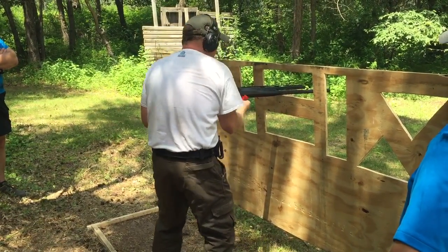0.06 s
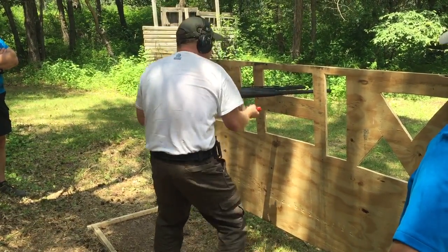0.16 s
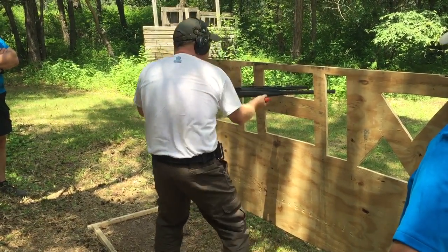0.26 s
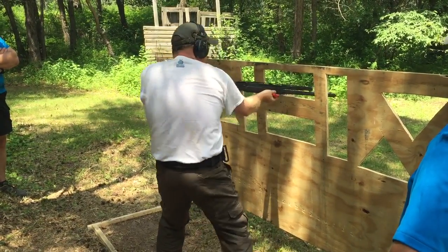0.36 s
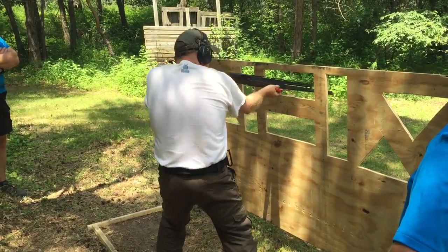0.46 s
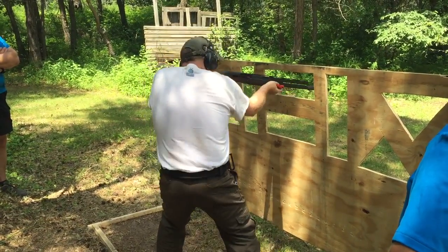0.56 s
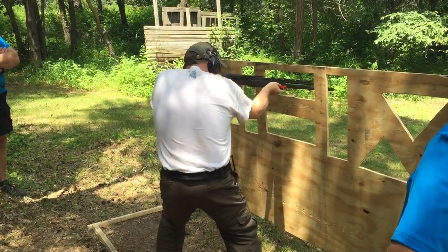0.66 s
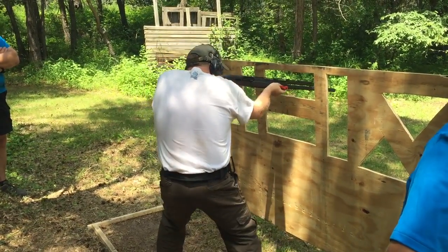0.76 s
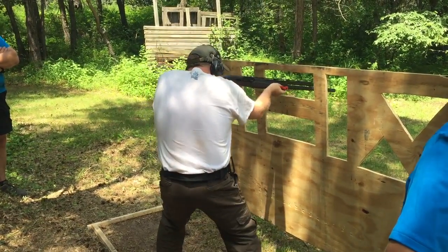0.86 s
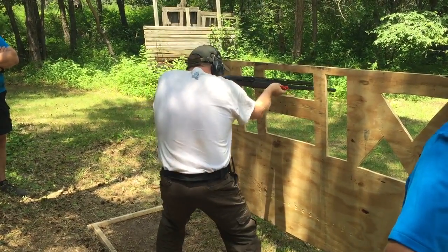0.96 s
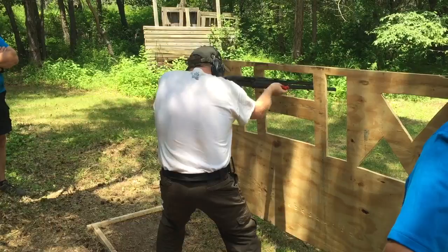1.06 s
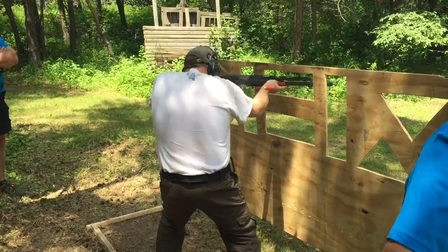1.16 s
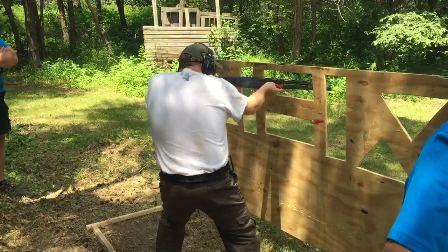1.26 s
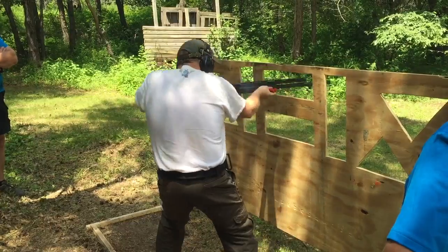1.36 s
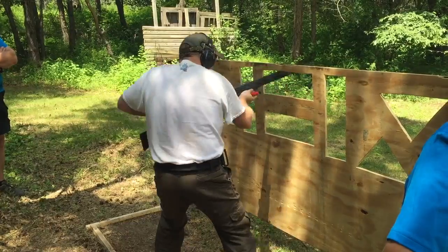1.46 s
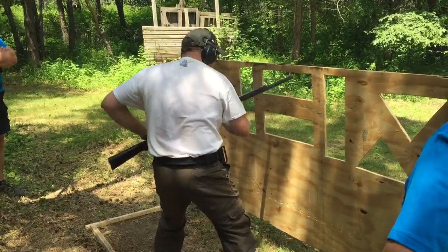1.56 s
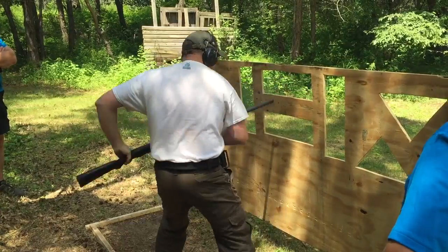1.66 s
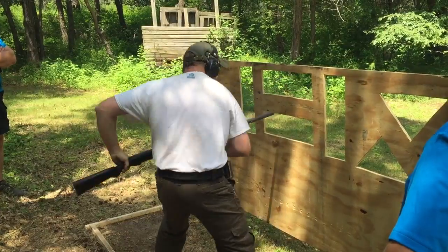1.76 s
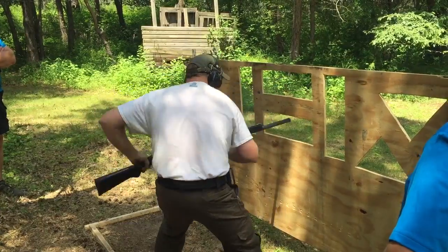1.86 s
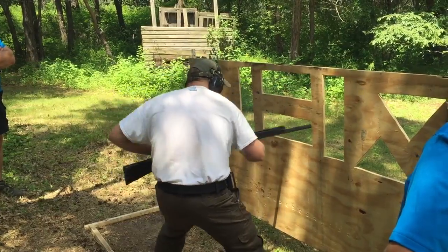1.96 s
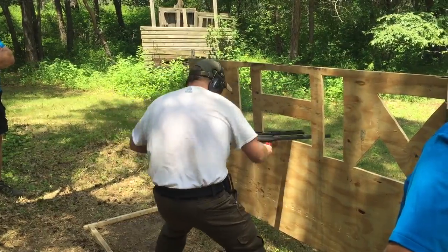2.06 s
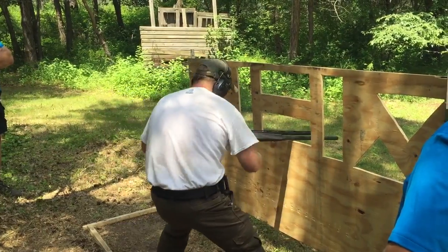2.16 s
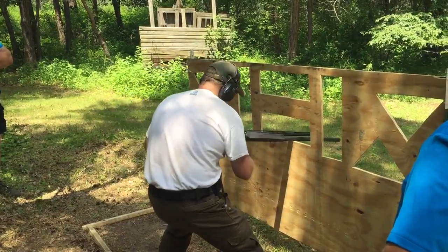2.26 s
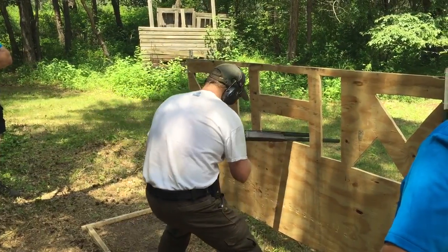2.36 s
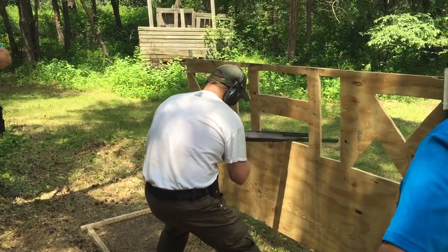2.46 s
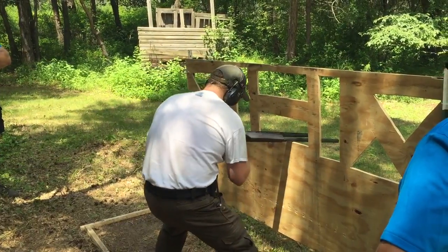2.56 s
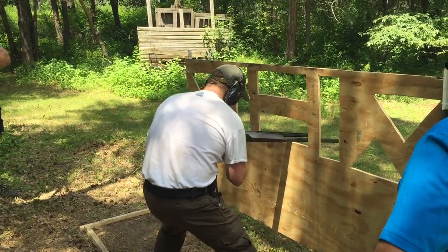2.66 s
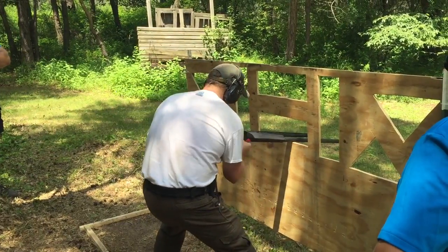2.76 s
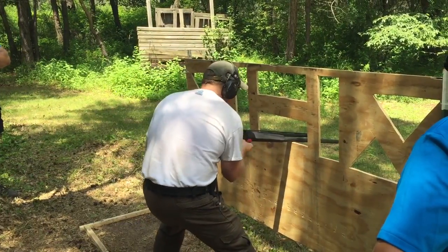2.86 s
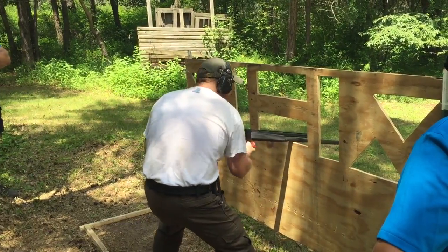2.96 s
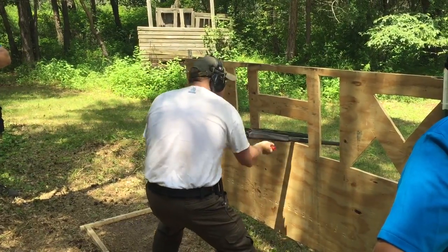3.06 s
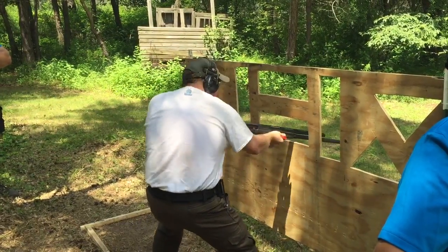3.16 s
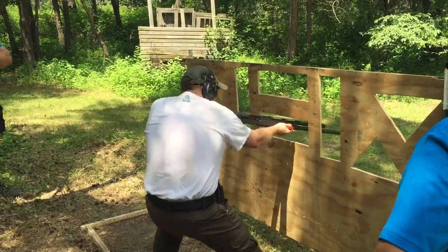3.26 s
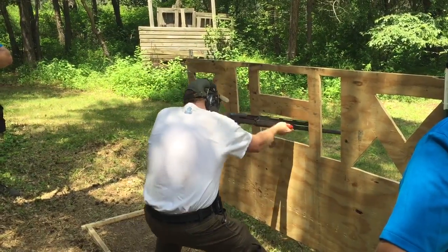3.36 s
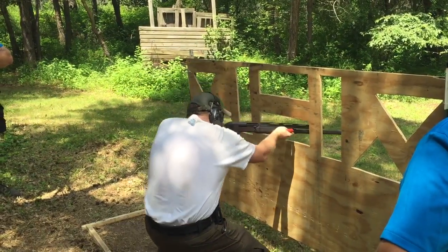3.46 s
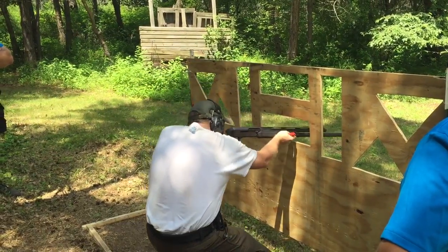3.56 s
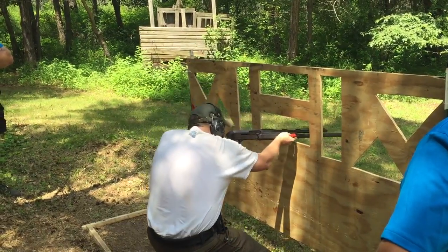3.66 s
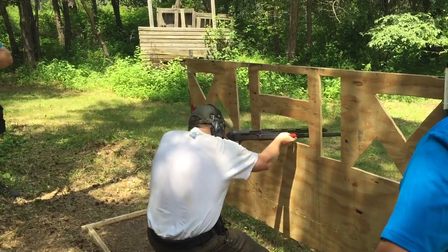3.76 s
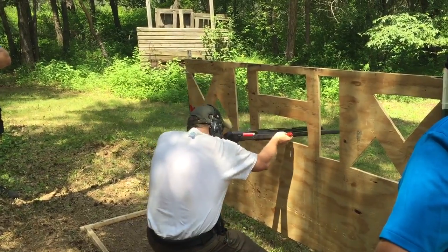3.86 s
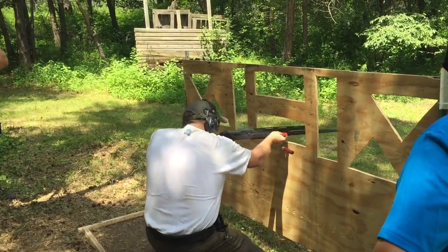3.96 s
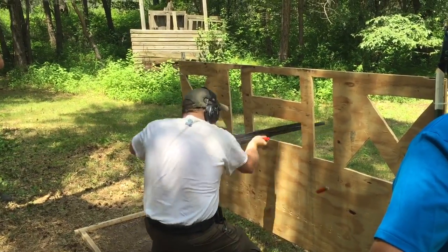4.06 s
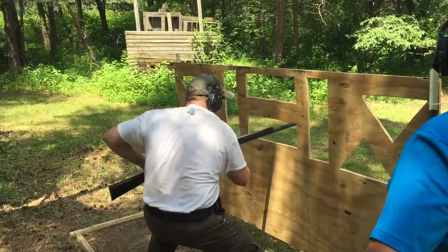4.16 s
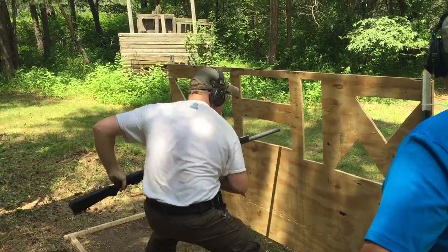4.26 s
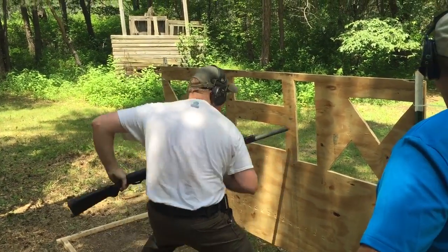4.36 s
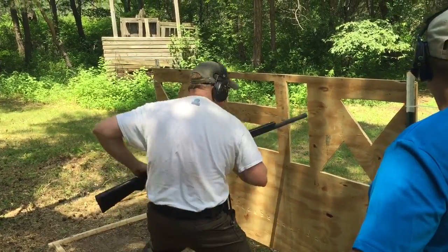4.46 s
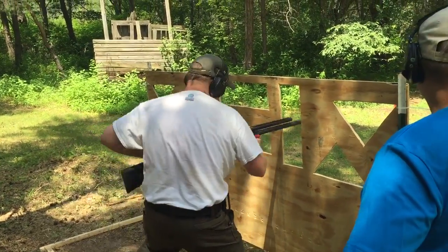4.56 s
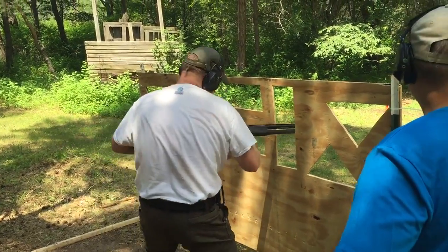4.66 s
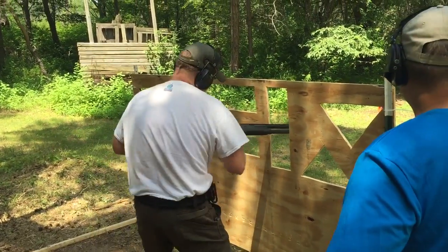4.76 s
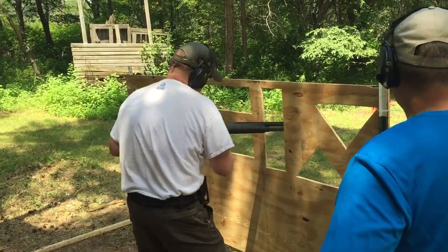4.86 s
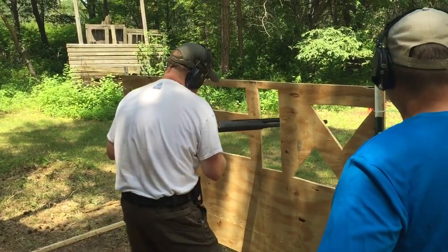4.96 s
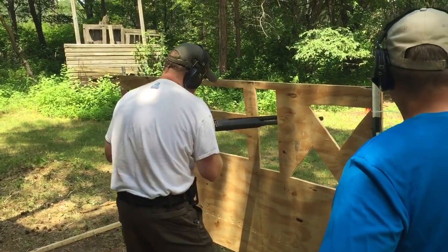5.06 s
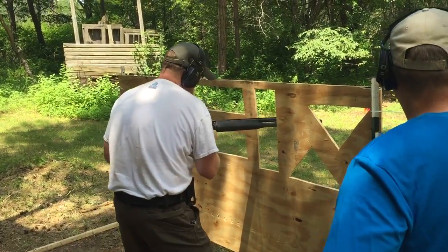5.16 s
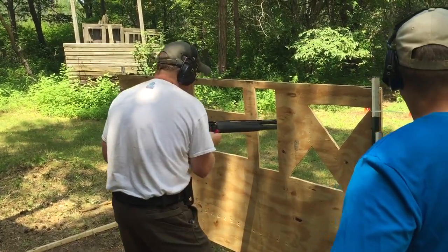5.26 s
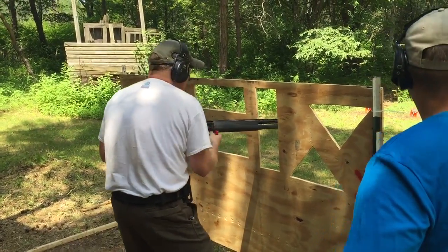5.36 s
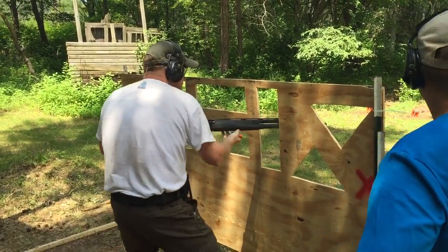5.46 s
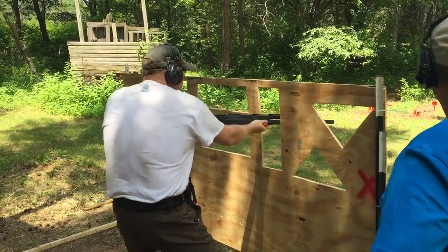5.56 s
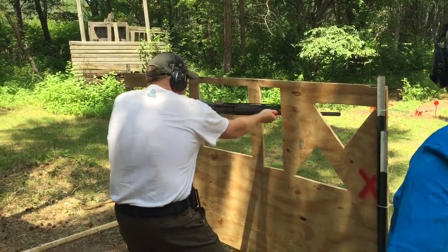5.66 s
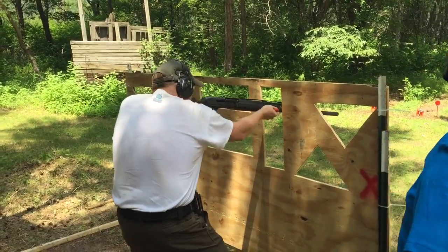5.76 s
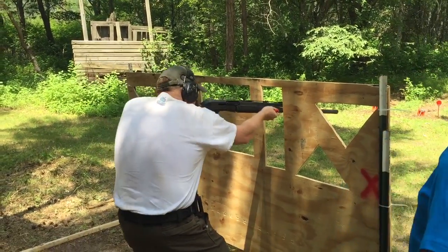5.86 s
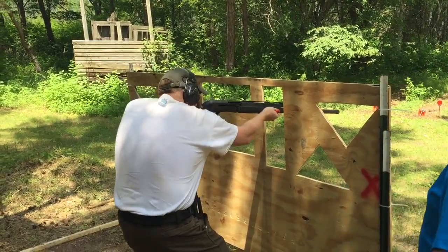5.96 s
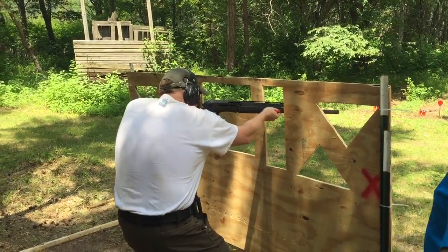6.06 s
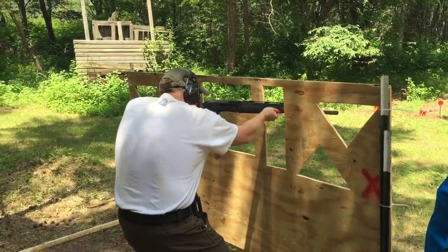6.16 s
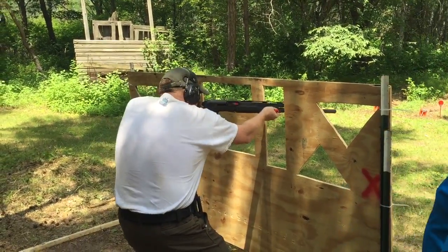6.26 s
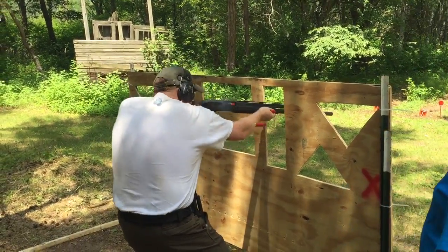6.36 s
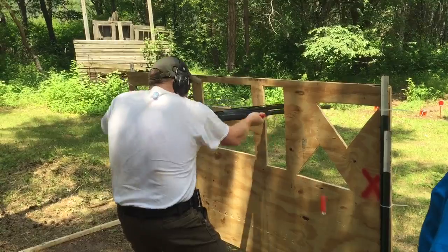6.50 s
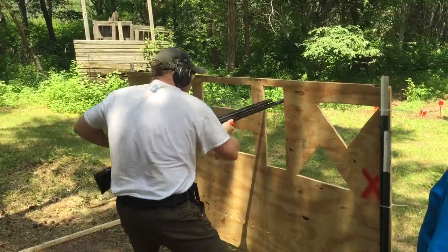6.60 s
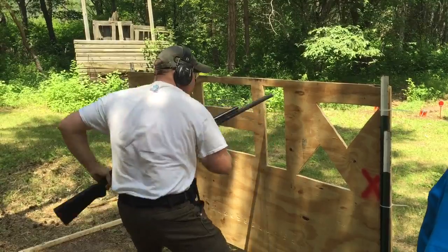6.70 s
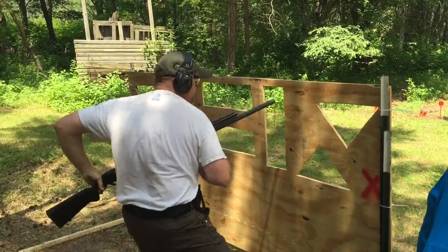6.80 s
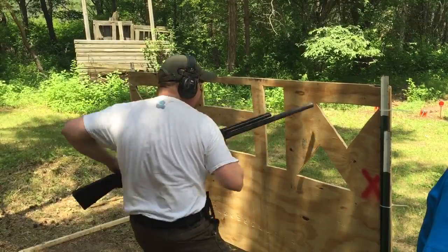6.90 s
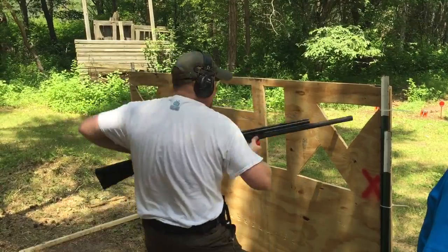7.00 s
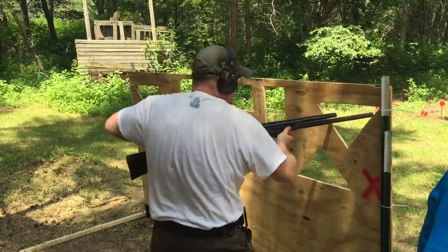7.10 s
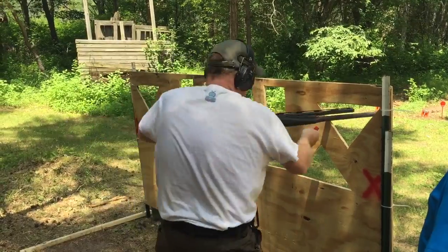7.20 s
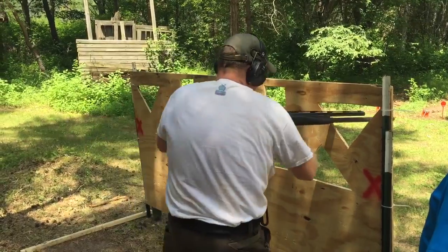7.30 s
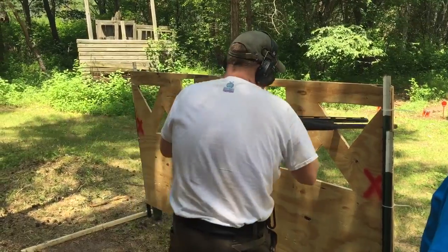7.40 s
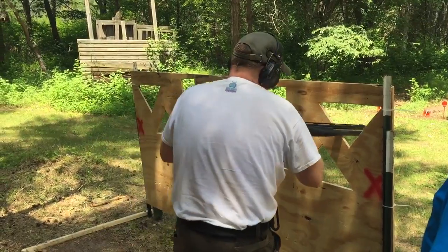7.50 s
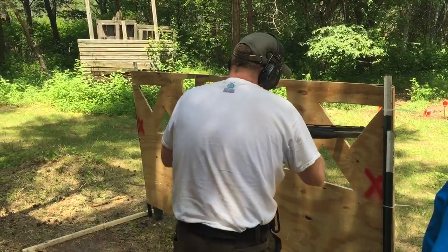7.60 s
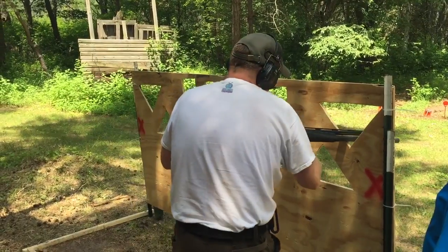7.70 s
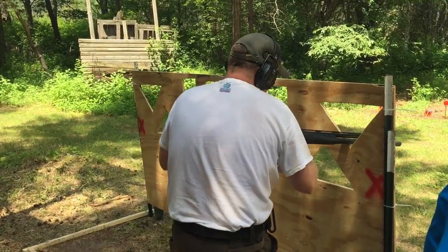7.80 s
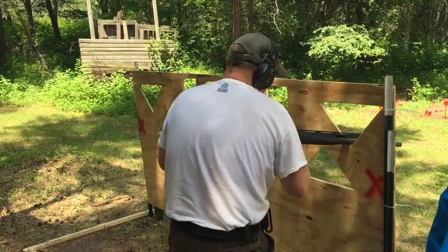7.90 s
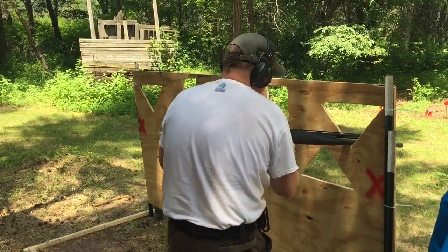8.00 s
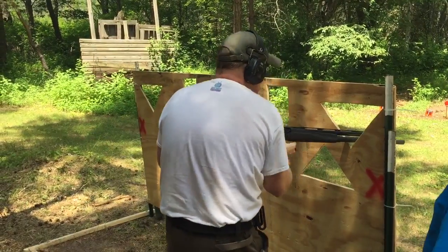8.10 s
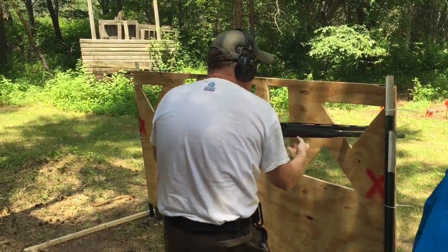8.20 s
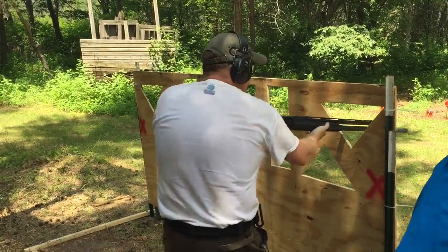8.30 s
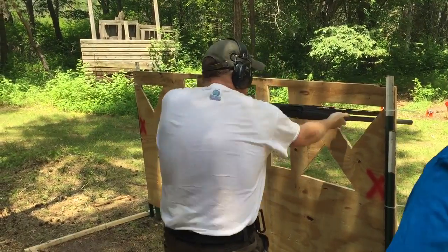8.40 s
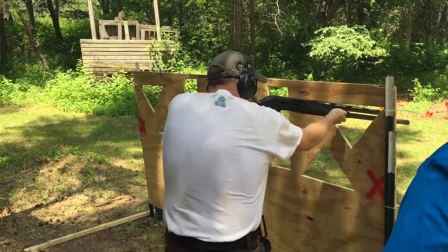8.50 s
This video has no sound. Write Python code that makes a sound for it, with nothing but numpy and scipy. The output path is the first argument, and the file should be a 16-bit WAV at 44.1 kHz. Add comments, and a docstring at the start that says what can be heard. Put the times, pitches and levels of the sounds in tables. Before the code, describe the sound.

Three huge overloading shotgun blasts seconds apart outdoors, each rolling into a long woodland roar, with sharp metallic loading clicks and board knocks between.

```python
"""In a wood, beside a plywood barricade, a self-loading shotgun fires three times, a few metres from the microphone.
Each blast is bursts of noise and a low punch; it overloads the microphone and the trees return a long dull roar.
Shells are loaded with clicks (short cracks and ringing metal) and slides (rough hiss), and a spent shell chimes.
The gun knocks the boards, cloth rustles and feet thud, all from shaped noise, the knocks with ringing metal too.
Two far guns boom, and a low rumble, which dips after each blast, lies over a faint hiss of leaves."""
import sys
import numpy as np
from scipy import signal
from scipy.fft import rfft, irfft, next_fast_len
from scipy.io import wavfile
from scipy.ndimage import uniform_filter1d

SR = 44100
rng = np.random.default_rng(int(sys.argv[2]) if len(sys.argv) > 2 else 0)


def store_pcm(level_fs):
    """Save levels as 16-bit WAV."""
    pcm = np.round(np.clip(level_fs, -1, 1) * 32767).astype(np.int16)
    wavfile.write(sys.argv[1], SR, np.atleast_2d(pcm).T)


N = 376612
T = np.arange(N) / SR  # time in seconds

# In all tables "t60" is the time a sound takes to die by 60 dB; levels are those before the microphone.

# The three shots. Each row: start in seconds, level in dB, level of the wood's roar in dB, extra roar
# around 1600 Hz in dB, delay of the bolt's slam in seconds, bass adjustment in dB.
SHOT_EVENTS = [(1.1935, 6.5, -17, -6, 0.056, 3.5), (3.9383, 7.5, -19, 0, 0.061, -8),
               (6.371, 8, -18, -4, .058, 2.5)]
# The blast opens sharp and sinks as the gas bubble grows. Each row: low edge in Hz, high edge in Hz,
# level in dB, rise time in seconds, t60 in seconds.
MUZZLE_BANDS = [(4080, 13000, -7.5, 0.0034, 0.095), (3000, 7400, -24, 0.0032, 0.46),
                (1230, 3500, 0.5, 0.0041, 0.087), (398, 1200, 2, 0.0061, 0.087),
                (118, 300, -1, 0.011, 0.074)]
# Every blast returns from ground and boards. Each row: delay in seconds, typical level in dB, t60 in
# seconds, added treble in dB, added bass in dB before the shot's own bass adjustment.
BLAST_RETURNS = [(.027, -1.5, .06, -5.5, -3), (.043, -9.5, .08, -8.5, -2.5), (.073, -10, .07, -13, -7),
                 (.092, -16, .13, -19, -9), (.117, -20.5, 0.057, -22, -21)]
# The bolt slams back, then shuts. Each row: seconds after the slam, level in dB, t60 in seconds,
# added treble in dB, added bass in dB before the shot's own bass adjustment.
BOLT_SLAMS = [(0, 0, .045, 2.5, -10.5), (0.071, -25.5, 0.086, 7.5, -22)]
# Tone colour of returns and bolt. Each row: frequency in Hz, relative level in dB per Hz.
BLAST_COLOUR = [(24, -34), (40, -4), (163, -3.5), (283, -14), (329, 1), (412, -7.5), (630, 5.5), (873, -2),
                (2980, -6), (14500, -23), (16000, -32.5)]
# Tone colour of the wood's roar. Each row: frequency in Hz, relative level in dB per Hz.
ROAR_COLOUR = [(59, -56), (100, -24.5), (193, -21), (381, -10), (424, -15), (648, -4.5), (1100, -17.5),
               (1550, -8.5), (2000, -16.5), (6150, -29.5), (12400, -36.5), (14700, -46.5), (16000, -78)]
# How each pitch dies among the trees. Each row: frequency in Hz, t60 of near trees in seconds,
# t60 of far trees in seconds, level of far trees relative to near ones in dB.
WOOD_DECAY = [(120, 0.44, 1.7, -2.5), (303, 0.8, 2.48, -9.5), (630, 1.3, 3.86, -7.5), (1620, 1.2, 3.6, -11),
              (3230, 1.48, 2.95, -13.5), (6160, 1.35, 1.5, -27), (15100, .6, 1.1, -14.5)]
# Metal and plastic clicks of loading. Each row: start in seconds, level in dB, pitch where the ring is
# strongest in Hz, added treble in dB.
LOADING_CLICKS = [(0.0179, -12, 2480, -9.5), (0.154, -29.5, 1940, -29), (0.635, -45, 5340, -25),
                  (0.167, -23, 3280, -16), (0.1853, -24.5, 3370, -22), (1.069, -50, 2950, -30),
                  (1.7511, -23, 1900, -15), (2.2016, -19, 2330, -15), (2.4044, -27, 2860, -15),
                  (2.439, -23.5, 7340, -9), (2.7745, -35.5, 1916, -22), (2.793, -30, 1940, -25),
                  (2.805, -20.5, 2000, -15), (2.8719, -16.5, 7300, -20), (2.889, -10, 3030, -12.5),
                  (3.0066, -34, 1430, -20), (3.025, -25, 2490, -19), (3.0618, -37, 4410, -16),
                  (3.0777, -34.5, 3170, -20), (4.5057, -29, 1380, -24), (4.616, -35, 1240, -14.5),
                  (4.7597, -31.5, 3380, -19), (4.8918, -28, 1340, -13.5), (4.902, -29, 1330, -14),
                  (4.915, -30, 1330, -18), (4.9882, -34.5, 9800, 0), (5.12, -32, 2060, -16),
                  (5.2013, -22, 2050, -15), (5.213, -36, 1970, -15), (5.2708, -26, 1360, -11),
                  (5.286, -23.5, 3800, -7.5), (5.3461, -14, 2920, -8.5), (5.452, -40, 5230, -29),
                  (5.471, -13, 2630, -13.5), (5.5828, -37, 1380, -7), (5.621, -10, 1180, -20),
                  (7.24, -31.5, 1390, -12), (7.307, -32.5, 1810, -16), (7.334, -24.5, 9100, -6),
                  (7.4811, -8.5, 1380, -14.5), (7.829, -52, 1280, 3.5), (8.0209, -28, 1800, -14),
                  (8.052, -30, 3400, -22), (8.061, -26, 3400, -8), (8.134, -16, 2930, -4),
                  (8.2363, -19, 1510, -6), (8.436, -33.5, 1330, -10)]
# Ringing tones of the gun. Each row: frequency in Hz, relative level in dB, t60 in seconds before the
# extra fade of each sound that uses them.
GUN_MODES = [(674, -32, 0.11), (784, -25, 0.062), (1130, -4, 0.19), (1346, 9.5, 0.015), (1590, -1.5, 0.19),
             (1912, 4.5, 0.098), (2660, 7.5, 0.019), (2964, 7.5, .06), (3350, 1.5, 0.031), (4237, 4, .05),
             (4700, -6, 0.038), (5450, -3, 0.042), (7050, -6, 0.099), (7300, -8, .05), (8800, -4, .04),
             (9100, -3, 0.09), (11800, -12, .04)]
# Dull knocks, mostly of the gun on the boards; the one at 4.208 s is an echo. Each row: start in seconds,
# level in dB, added treble in dB, t60 of the crack in seconds.
DULL_KNOCKS = [(.373, -30, -15, 0.093), (0.386, -21, -18, 0.068), (.492, -37, -23, 0.038),
               (0.5404, -39, -15, 0.081), (0.5857, -41, -13, 0.13), (2.224, -26.5, -15.5, 0.072),
               (3.273, -35, -35, 0.047), (3.385, -43, -30, .1), (3.412, -23, -30, 0.14),
               (3.4391, -33, -24.5, 0.076), (3.5716, -30.5, -28, .04), (4.208, -19.5, -21, .04),
               (7.603, -31.5, -18.5, 0.064)]
# A spent shell's brass base lands and bounces. Each row: start in seconds, typical level in dB,
# pitch where the ring is favoured in Hz.
SHELL_CHIMES = [(6.929, -38, 7500), (6.95, -24.5, 5500), (7.213, -45, 6330)]
# Ringing tones of the brass. Each row: frequency in Hz, relative level in dB, t60 in seconds before an extra fade.
BRASS_MODES = [(2630, -8, .15), (3660, 0, 0.16), (3914, -13, .3), (6330, -1, 0.18), (6860, -14, .12),
               (7560, -10, .07), (8970, -12, 0.16), (11260, -10, .05), (12350, -24, 0.31), (13750, -24, .2)]
# A shell or the bolt slides home. Each row: start in seconds, time it seats in seconds, level on seating in dB.
SLIDE_EVENTS = [(-.03, 0.026, -33.5), (2.79, 2.809, -40), (2.828, 2.893, -31), (3.404, 3.417, -35),
                (5.28, 5.338, -32.5), (8.027, 8.075, -44), (8.089, 8.135, -30)]
# Cloth and hands rubbing. Each row: start in seconds, end in seconds, typical level in dB,
# top of the hiss in Hz.
RUSTLE_EVENTS = [(0.033, 0.244, -52.5, 11900), (0.249, .49, -43.5, 6200), (.5, 0.766, -55.5, 2200),
                 (0.777, .9, -47, 5800), (2.918, 3.12, -55.5, 11030), (3.18, 3.267, -60.5, 9050),
                 (5.195, 5.3, -50.5, 9040), (5.37, 5.465, -56, 8980), (5.607, 5.686, -47.5, 8040),
                 (5.477, 5.566, -57.5, 8990), (6.898, 7.257, -62, 13020), (7.316, 7.47, -54.5, 10990),
                 (7.5, 7.656, -59, 11040), (8.17, 8.23, -57, 11000), (8.244, 8.312, -55.5, 7000)]
# Feet on soft ground. Each row: start in seconds, level in dB before halving, pitch in Hz, t60 in seconds.
FOOTSTEPS = [(0.519, -39.5, 184, .45), (0.686, -39, 119, .2), (1.612, -31.5, 224, 0.2),
             (2.204, -32.5, 192, 0.38), (3.42, -25, 220, .22), (3.477, -35, 194.3, .45),
             (7.089, -34, 95, .17), (7.242, -27, 175, .3), (7.603, -36, 130, 0.4)]
# Distant shots. Each row: start in seconds, level of the boom in dB, level of the roar in dB.
FAR_SHOTS = [(5.792, -27.5, -36.5), (8.38, -27, -38.5)]
# Tone colour of the far roar. Each row: frequency in Hz, relative level in dB per Hz.
FAR_ROAR_COLOUR = [(59, -36), (100, -26.5), (193, -22), (540, -4.5), (649, 0), (2470, -20), (2710, -23),
                   (8000, -53), (10400, -99), (17600, -120)]
# Level of the low rumble, which dips after each blast and recovers. Each row: time in seconds,
# typical level in dB.
RUMBLE_LEVELS = [(0.0, -55), (0.12, -55), (1.16, -54), (1.42, -57), (3.64, -51), (4.07, -56), (4.5, -66),
                 (4.68, -65), (4.95, -55.5), (6.42, -53.5), (6.66, -61.5), (6.92, -61), (7.25, -54),
                 (8.54, -55.5)]
# Tone colour of the low rumble of wind. Each row: frequency in Hz, relative level in dB per Hz.
RUMBLE_TONE = [(15, -40.5), (25, -18), (39, -5.5), (70, 5), (135, -2.5), (194, -25), (259, -24.5),
               (300, -25), (390, -51.5), (660, -120)]
# Tone colour of the leaf hiss. Each row: frequency in Hz, relative level in dB per Hz.
LEAF_TONE = [(120, -39), (200, -14.5), (380, -11.5), (432, -19), (696, -9.5), (1480, -25), (4950, -29.5),
             (14900, -34.5), (16000, -41.5)]

LEAD_IN_S, LEAD_TICK_DB = 0.021, -36.5
SWELL_DB, SWELL_DB_PER_S = -7.5, 1500
PUNCH_HZ, PUNCH_DB, PUNCH_RISE_S = 73.6, -8.5, 0.0072
RETURN_SPREAD_DB = 1.5
CLICK_T60_S, CLICK_BODY_DB = 0.058, -25.5
KNOCK_HZ, KNOCK_BODY_DB, KNOCK_LOW_DB = 1605, -7, -8
BRASS_REACH_OCT, BRASS_TICK_DB = 1.4, -18
SLIDE_SWELL_DB, SLIDE_STOP_S, SLIDE_TREBLE_DB = -19.5, 0.044, -0.5
RUSTLE_EDGE_S, RUSTLE_SAG_DB, RUSTLE_FADE_S = 0.028, -5, 0.12
LEAF_DB = -63.5
MIC_LOW_HZ, MIC_CEILING, TOP_HZ = 39, 0.56, 15500


def blasts():
    """A faint lead-in, turbulent gas and a pressure punch, then the returns and the bolt."""
    out, t = np.zeros(N), T[:SR // 2]
    for s, db, _, _, bolt_s, low_db in SHOT_EVENTS:
        add(out, s - LEAD_IN_S, lead_in())
        gas = 0
        for lo_hz, hi_hz, gas_db, rise, t60 in MUZZLE_BANDS:
            gas = gas + undb(gas_db) * band(lo_hz, hi_hz, len(t)) * fade(t, t60, rise)
        punch = np.sin(2 * np.pi * PUNCH_HZ * t) * fade(t, 0.14, PUNCH_RISE_S)
        punch *= undb(PUNCH_DB + 0.6 * low_db)
        add(out, s, undb(db) * (gas + punch))
        for delay, back_db, t60, treble_db, bass_db in BLAST_RETURNS:
            back_db += RETURN_SPREAD_DB * rng.standard_normal()
            add(out, s + delay, surge(t, back_db, t60, treble_db, bass_db + low_db))
        for delay, slam_db, t60, treble_db, bass_db in BOLT_SLAMS:
            add(out, s + bolt_s + delay, surge(t, slam_db, t60, treble_db, bass_db + low_db))
    return out


def lead_in():
    """A faint tick, then middle tones swell into the blast."""
    t = T[:SR // 2]
    t = t[t < 1.5 * LEAD_IN_S]
    rise_db = SWELL_DB_PER_S * np.minimum(t - LEAD_IN_S, 0)
    swell = undb(SWELL_DB + rise_db) * band(380, 2600, len(t))
    tick = undb(LEAD_TICK_DB) * band(2000, 14000, len(t)) * fade(t, 0.057, 0.0018)
    return swell + tick


def surge(t, db, t60, treble_db, bass_db):
    """One return or slam: a burst of noise broken into lumps by scattered boards."""
    gas = noise(BLAST_COLOUR, len(t))
    gas += undb(treble_db) * band(3000, 17000, len(t)) * fade(t, t60 / 2)
    gas *= undb(3.8 * walk(140)[:len(t)])  # the lumps
    bass = undb(bass_db) * band(38, 330, len(t))
    return undb(db) * fade(t, t60, 0.0018) * (gas + bass)


def wood(shots, colour, far_db):
    """Trunks scatter each shot back; every band dies at its own pace and comes in patches."""
    out, patches = np.zeros(N), walk(8.8)
    t = T[::32]  # coarse time steps are enough for slow level curves
    centres = 100 * 2 ** np.arange(0, 7.3, 1 / 4)  # Hz, four bands an octave
    share = on_log(centres, colour) + 10 * np.log10(centres)  # wider bands hold more power
    share -= 10 * np.log10(np.sum(undb(share) ** 2))  # total power of 1
    for hz, db in zip(centres, share):
        near_t60, far_t60, late_db = (on_log(hz, WOOD_DECAY, column=k) for k in (1, 2, 3))
        upper = np.exp(-np.log2(hz / 1600) ** 2 / 0.061)
        power = 0
        for s, roar_db, upper_db in shots:
            near = fade(t - s, near_t60, 0.012)
            far = undb(late_db + far_db) * fade(t - s, far_t60, 0.12)
            power = power + undb(roar_db + upper * upper_db) ** 2 * (near ** 2 + far ** 2)
        grain = noise([(hz / 2, -120), (hz / 1.09, 0), (hz * 1.09, 0), (hz * 2, -120)])
        flicker = undb(db + 1.1 * patches + 2.0 * walk(25))
        out += flicker * np.interp(T, t, np.sqrt(power)) * grain
    return out


def loading():
    """Short clicks as parts of the action strike and ring."""
    out = np.zeros(N)
    for s, db, hz, treble_db in LOADING_CLICKS:
        add(out, s, click(db, hz, CLICK_BODY_DB, treble_db, CLICK_T60_S))
    return out


def click(db, hz, body_db, treble_db, t60):
    """A crack plus the gun's ringing tones nearest to where it is struck."""
    t = T[:SR // 5]
    reach = [np.exp(-np.log2(f / hz) ** 2 / 0.15) * rng.uniform(0.4, 1) + 1e-6 for f, _, _ in GUN_MODES]
    crack = 0.21 * band(hz / 2, hz * 2, len(t)) + 0.084 * band(1100, 4300, len(t))
    crack += undb(body_db) * band(560, 1030, len(t))
    crack += undb(treble_db) * band(3450, 10600, len(t)) * fade(t, 1.13 * t60)
    crack *= fade(t, t60, 0.00035) + 0.027 * fade(t, 3 * t60)  # main fade and a faint longer tail
    metal = 0.57 * ring(GUN_MODES, t, reach) * fade(t, 1.54 * t60)
    return undb(db) * (crack + metal)


def knocks():
    """Dull knocks, mostly the gun on the boards: a click with more body, over a low burst."""
    out, t = np.zeros(N), T[:SR // 5]
    for s, db, treble_db, t60 in DULL_KNOCKS:
        low = undb(db + KNOCK_LOW_DB) * band(150, 780, len(t)) * fade(t, 1.12 * t60, 0.0011)
        add(out, s, click(db, KNOCK_HZ, KNOCK_BODY_DB, treble_db, t60) + low)
    return out


def chimes():
    """A spent shell's brass rings strongest near the struck pitch, after a tiny tick."""
    out, t = np.zeros(N), T[:SR // 2]
    for s, db, hz in SHELL_CHIMES:
        reach = [np.exp(-(np.log2(f / hz) / BRASS_REACH_OCT) ** 2) for f, _, _ in BRASS_MODES]
        chime = ring(BRASS_MODES, t, reach) * fade(t, 0.6, 0.0023)
        chime += undb(BRASS_TICK_DB) * band(3000, 15000, len(t)) * fade(t, 0.06)
        add(out, s, undb(db + 1.9 * walk(79)[:len(t)]) * chime)  # the tumbling shell wavers
    return out


def slides():
    """Dense slips of friction hiss and shake the gun's ringing tones, louder until the part seats."""
    ticks = rng.standard_normal(N) * (rng.random(N) < 900 / SR)  # about 900 slips a second
    t = T[:SR // 10]
    modes = GUN_MODES[4:]
    shaken = ring(modes, t, rng.uniform(0.2, 1, len(modes))) * fade(t, 0.12)
    rattle = signal.fftconvolve(ticks, shaken)[:N]
    metal = band(1000, 5520) + 1.1 * rattle / np.std(rattle)
    metal += undb(SLIDE_TREBLE_DB) * band(4200, 14000)
    out = np.zeros(N)
    for start, seats, db in SLIDE_EVENTS:
        stop = seats + SLIDE_STOP_S
        times = [start - 0.02, start, seats, stop, stop + 0.047]
        push = np.interp(T, times, [-80, SLIDE_SWELL_DB, 0, -22, -80])
        out += undb(db + push) * metal
    return out * slips()


def rustles():
    """Cloth and hands rub with uneven friction that only hisses."""
    out, edge = np.zeros(N), RUSTLE_EDGE_S
    for start, end, db, top_hz in RUSTLE_EVENTS:
        times = [start - edge, start, start + edge, end, end + edge, end + RUSTLE_FADE_S]
        push = np.interp(T, times, [-60, -10, 0, RUSTLE_SAG_DB, -15, -30], right=-99)
        hiss = noise([(150, -40), (800, -2), (top_hz, -4), (1.3 * top_hz, -16), (40000, -30)])
        out += undb(db + push + 2.1 * walk(25) + 2.3 * walk(70)) * hiss
    return out * slips()


def slips():
    """Friction lets go in slips of uneven size: a restless level of rms 1."""
    x = undb(1.1 * walk(150) + 1.0 * walk(420))
    return x / np.sqrt(np.mean(x ** 2))


def steps():
    """Feet on soft ground: low bursts of noise that rise gently and die."""
    out, t = np.zeros(N), T[:SR // 2]
    for s, db, hz, t60 in FOOTSTEPS:
        thud = band(hz / 1.54, hz * 1.14, len(t)) * fade(t, t60, 0.0072)
        add(out, s, undb(db) * 0.5 * thud)
    return out


def far_guns():
    """A dull crack and about two cycles of boom, then the wood answers."""
    out, t = np.zeros(N), T[:SR // 4]
    for s, boom_db, _ in FAR_SHOTS:
        boom = np.sin(2 * np.pi * 105 * t) * fade(t, 0.1) * (t < 0.02)
        crack = 0.62 * band(340, 1980, len(t)) * fade(t, 0.067)
        add(out, s, undb(boom_db) * (boom + crack))
    return out + wood([(s, roar_db, 0) for s, _, roar_db in FAR_SHOTS], FAR_ROAR_COLOUR, 2.3)


def breeze():
    """Low rumble of wind on the microphone over the faint hiss of leaves, both wandering in level."""
    rumble_db = np.interp(T, *np.transpose(RUMBLE_LEVELS)) + 1.1 * walk(4.0)
    rumble = undb(rumble_db) * noise(RUMBLE_TONE)
    leaves = undb(LEAF_DB + 1.5 * walk(1.4)) * noise(LEAF_TONE)
    return rumble + leaves


def undb(db):
    """Turn dB into a plain multiplier."""
    return 10 ** (np.asarray(db) / 20)


def on_log(hz, table, column=1):
    """Read a table along a log-frequency axis."""
    table = np.array(table, float)
    return np.interp(np.log(hz), np.log(table[:, 0]), table[:, column])


def noise(table, size=N):
    """Noise of rms 1 coloured by (Hz, dB) points."""
    fast = next_fast_len(size)
    hz = np.maximum(np.fft.rfftfreq(fast, 1 / SR), 1)
    spectrum = rfft(rng.standard_normal(fast)) * undb(on_log(hz, table))
    x = irfft(spectrum, fast)[:size]
    return x / np.std(x)


def band(lo_hz, hi_hz, size=N):
    """Noise of rms 1, strongest between two edges and sloping away outside them."""
    return noise([(lo_hz / 8, -80), (lo_hz, 0), (hi_hz, 0), (hi_hz * 8, -80)], size)


def fade(t, t60, rise=0.00013):
    """Quick rise from t = 0 while dying by 60 dB in t60 seconds (at least 4 ms)."""
    t = np.maximum(t, 0)
    return (1 - np.exp(-t / rise)) * undb(-60 * t / max(t60, 0.004))


def walk(rate):
    """Smooth random wandering of spread 1, with `rate` new values a second."""
    k = int(SR / rate)
    x = np.repeat(rng.standard_normal(N // k + 1), k)
    x = uniform_filter1d(uniform_filter1d(x, k), k)[:N]
    return x / np.std(x)


def add(out, s, x):
    """Mix x in at s seconds."""
    i = int(s * SR)
    out[i:i + len(x)] += x[:len(out) - i]


def ring(modes, t, gains):
    """Struck metal: dying sine tones that start at t = 0, scaled to a peak of 1."""
    x = 0
    for gain, (hz, db, t60) in zip(gains, modes):
        x = x + gain * undb(db) * np.sin(2 * np.pi * hz * t) * fade(t, t60)
    return x / np.abs(x).max()


def scene():
    """Add all the sources together as one channel."""
    shots = [(s, roar_db, upper_db) for s, _, roar_db, upper_db, _, _ in SHOT_EVENTS]
    gun = blasts() + wood(shots, ROAR_COLOUR, 0.0)
    handling = loading() + knocks() + chimes() + slides() + rustles()
    return (gun + handling + steps() + far_guns() + breeze())[None]


def record(dry):
    """Deep bass is lost, the microphone overloads with flat tops, and the top is cut."""
    low_cut = signal.butter(2, MIC_LOW_HZ, "high", fs=SR, output="sos")
    x = signal.sosfilt(low_cut, dry)
    flat = x / (1 + np.abs(x / MIC_CEILING) ** 4) ** (1 / 4)
    top_cut = signal.ellip(12, 0.2, 100, TOP_HZ, fs=SR, output="sos")
    return signal.sosfilt(top_cut, flat)


dry = scene()
out = record(dry)
store_pcm(out)
```